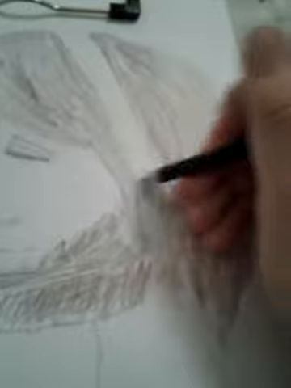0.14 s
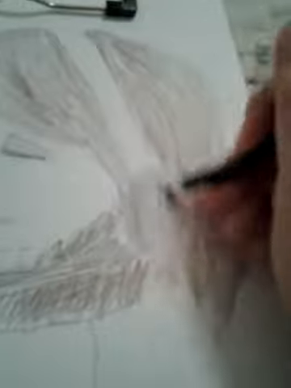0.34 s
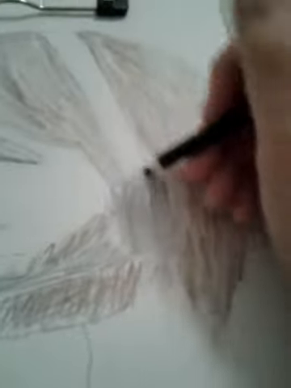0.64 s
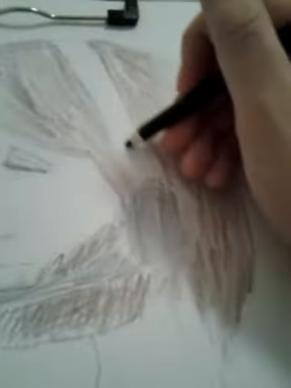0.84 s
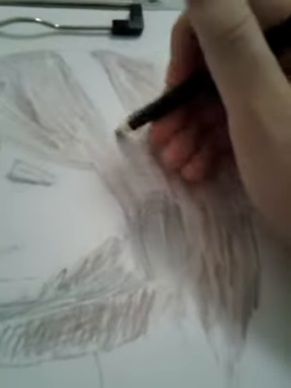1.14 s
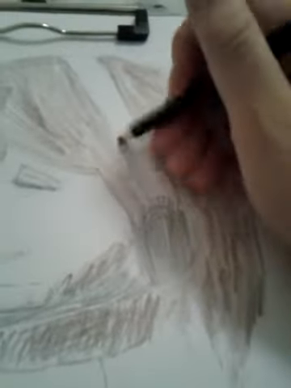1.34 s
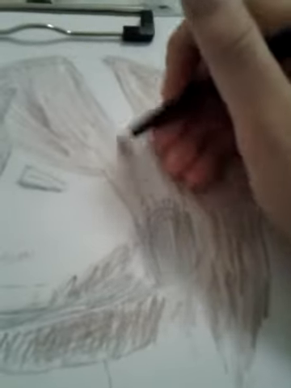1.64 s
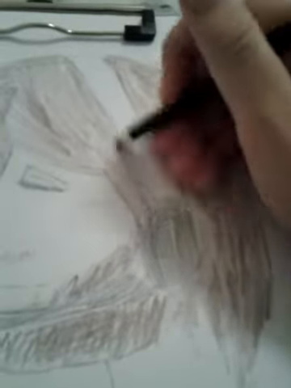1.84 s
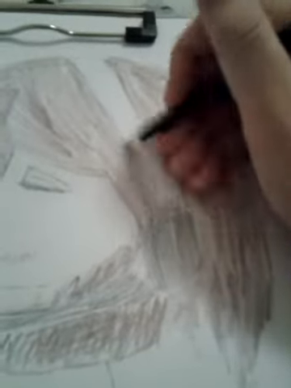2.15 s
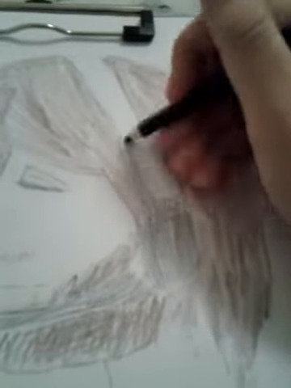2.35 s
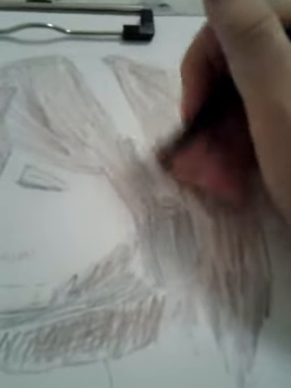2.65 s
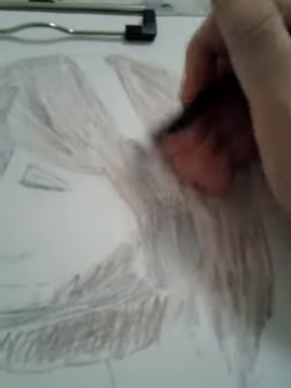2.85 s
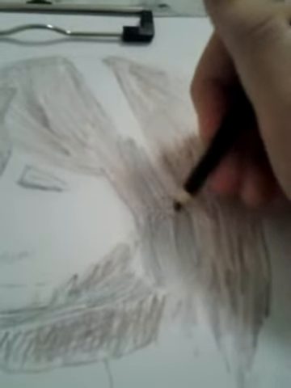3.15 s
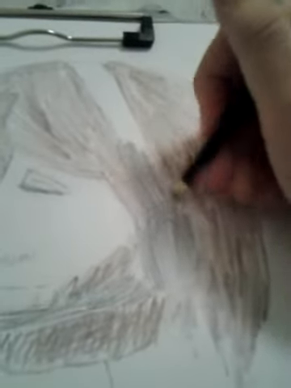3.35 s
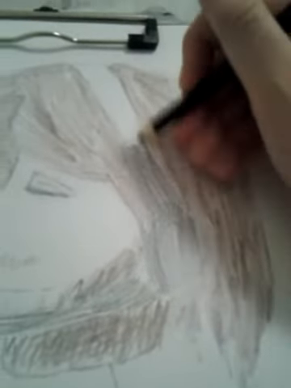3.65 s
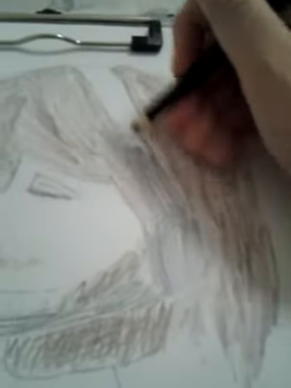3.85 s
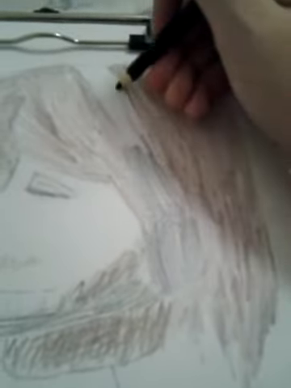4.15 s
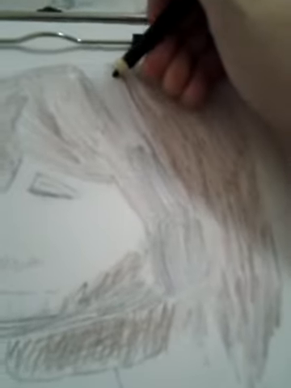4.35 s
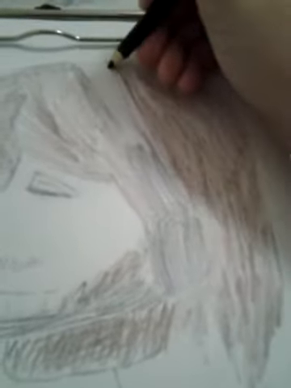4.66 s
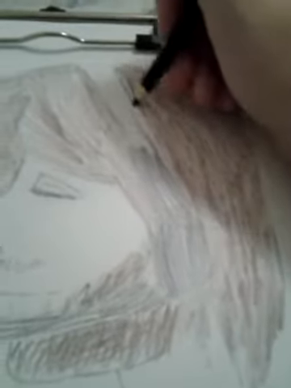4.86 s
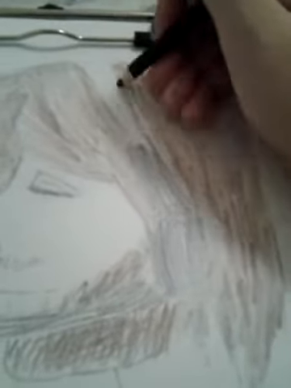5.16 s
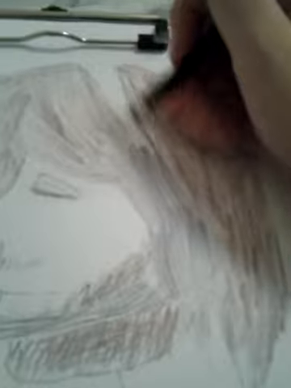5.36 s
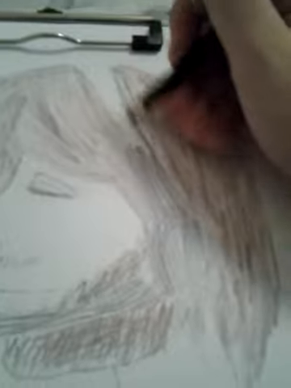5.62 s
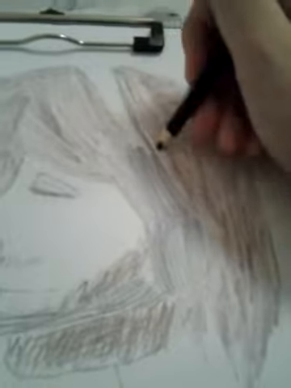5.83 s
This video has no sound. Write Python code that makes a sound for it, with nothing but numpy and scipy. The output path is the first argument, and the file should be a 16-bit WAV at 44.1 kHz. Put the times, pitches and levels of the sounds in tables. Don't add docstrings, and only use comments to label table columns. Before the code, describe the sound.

Close, dry mono sound of a pencil shading paper on a clipboard in a small quiet room. It opens mid-stroke: about five loose, uneven scratches until 0.55 s, with the tip digging in and a dull low knock of the board at 0.2 s, and the hand rubbing the sheet. At 0.6 s the tip lands with a dry tick; soft skin brushes follow at about 0.7 and 0.85 s. From 0.95 to 4.0 s comes a steady long run of alternating strokes, around eight or nine a second, bright grainy hiss over woody midrange, the board strongest near 1.7 s, with tiny fibre snaps. The hand slides away softly and only room noise remains until 4.76 s. A last run of ten slightly slower strokes, loudest near 5.3 s, lasts to the end around 6 s. Throughout: faint distant fan, microphone hiss, and a barely audible very high whistle.

```python
import sys
import numpy as np
from scipy import signal
from scipy.fft import rfft, irfft, next_fast_len
from scipy.io import wavfile
from scipy.ndimage import uniform_filter1d, map_coordinates

SR = 44100
rng = np.random.default_rng(int(sys.argv[2]) if len(sys.argv) > 2 else 0)


def to_wav(sig):
    pcm = np.clip(np.atleast_2d(sig), -1, 1) * 32767
    pcm = np.round(pcm).astype(np.int16)
    wavfile.write(sys.argv[1], SR, pcm.T)


def volts_from_db(level):
    exponent = np.asarray(level, float) / 20
    return 10 ** exponent


N = 264159

AREA_ENDS = [.8, 1.93, 4.4]


def unit(x):
    return x / np.sqrt(np.mean(x ** 2) + 1e-20)


def along(points, hz):
    f, v = np.transpose(points)
    return np.interp(np.log(hz + 1), np.log(f + 1), v)


def wobble(rate):
    return map_coordinates(rng.standard_normal(int(N * rate / SR) + 4), [np.arange(N) * rate / SR])


def filtered(x, response):
    m = next_fast_len(N + SR // 4)
    return irfft(rfft(x, m) * response(np.fft.rfftfreq(m, 1 / SR)), m)[:N]


def coloured(x, points):
    return unit(filtered(x, lambda f: volts_from_db(along(points, f))))


def fibres(per_second, spread_db, smooth):
    size_db = spread_db * np.clip(rng.standard_normal(N), -2, 2)
    trips = (rng.random(N) < per_second / SR) * volts_from_db(size_db) * rng.choice([-1, 1], N)
    return unit(unit(trips) + smooth * rng.standard_normal(N))


def patches(shape, depth_db):
    field = uniform_filter1d(rng.standard_normal(shape), size=4, axis=0)
    field = uniform_filter1d(field, size=12, axis=1)
    return volts_from_db(depth_db * unit(field))


def uneven(x, depth_db):
    z = signal.stft(x, nperseg=256)[2]
    return signal.istft(z * patches(z.shape, depth_db), nperseg=256)[1][:N]


def tilted(x, split_hz, tilt_db):
    low = filtered(x, lambda f: 1 / (1 + (f / split_hz) ** 8))
    area = np.searchsorted(AREA_ENDS, np.arange(N) / SR)
    tilt = volts_from_db(uniform_filter1d(np.take(np.array(tilt_db, float), area), size=8000))
    return low / tilt + (x - low) * tilt


def strokes():
    # start in seconds [s], fastest moment in seconds [s], tip level in dB [dB].
    loose_run = [
        (-0.077, -0.032, -43),
        (0.038, 0.12, -45.5),
        (0.18, 0.222, -42),
        (0.3, 0.405, -46),
        (0.423, 0.488, -46),
    ]
    landing = [
        (0.587, 0.604, -48),
    ]
    long_run = [(0.95, 1.012, -46), (1.065, 1.113, -45.5), (1.176, 1.255, -42.5), (1.305, 1.35, -43.5),
                (1.417, 1.49, -44.5), (1.547, 1.59, -46), (1.668, 1.744, -45), (1.805, 1.846, -45.5),
                (1.92, 2.015, -44.5), (2.066, 2.099, -43.5), (2.171, 2.251, -44), (2.305, 2.344, -43.5),
                (2.406, 2.486, -45), (2.537, 2.579, -44.5), (2.646, 2.71, -43.5), (2.766, 2.819, -45.0),
                (2.869, 2.931, -44), (2.994, 3.043, -45.5), (3.098, 3.152, -43.5), (3.215, 3.28, -45),
                (3.325, 3.373, -44.5), (3.434, 3.51, -44.5), (3.543, 3.6, -47), (3.659, 3.72, -46),
                (3.765, 3.819, -48.5), (3.86, 3.914, -47.1)]
    last_run = [
        (4.76, 4.798, -45),
        (4.887, 4.95, -48),
        (4.989, 5.053, -45),
        (5.126, 5.194, -47),
        (5.242, 5.289, -42.5),
        (5.374, 5.429, -45),
        (5.49, 5.555, -44.5),
        (5.614, 5.7, -47.5),
        (5.767, 5.82, -47.5),
        (5.889, 5.976, -46.6),
    ]
    run_ends = [.554, .666, 4.008, 6.02]
    # after a push [s], after a pull [s].
    turn_s = [(.033, .019), (0, 0), (.001, .009), (.008, .002)]
    # time in seconds [s], board over tip in dB [dB].
    hand_weight = [(0, -15.5), (1.1, -10.5), (1.35, -9), (1.7, -6), (1.95, -8.5), (3.05, -9), (3.52, -10),
                   (3.65, -14), (6, -11.5)]
    pull_change_db = [0, 0.71, 0.94, 0.49]
    shaft_over_tip_db = [-11.5, -12, -13, -13.5]
    shaft_follows = .75
    rows = []
    runs = [loose_run, landing, long_run, last_run]
    for run, end, turn, pull_db, shaft_db in zip(runs, run_ends, turn_s, pull_change_db, shaft_over_tip_db):
        for k, (start, fastest, tip_db) in enumerate(run):
            direction = (-1) ** k
            stop = run[k + 1][0] + turn[k % 2] if k + 1 < len(run) else end
            weight_db = np.interp(fastest, *np.transpose(hand_weight)) - direction * pull_db
            over_tip_db = np.array([0, weight_db, shaft_db + shaft_follows * (weight_db + 10)])
            rows.append((start, fastest, stop, direction, tip_db + over_tip_db))
    return rows


def motion(rise, fall, even, lean_db):
    t = np.arange(0, N / SR + .001, .001)
    gains, place, speed = np.zeros((3, len(t))), np.zeros(len(t)), np.zeros(len(t))
    for start, fastest, stop, direction, levels_db in strokes():
        middle = (start + stop) / 2
        halfway = [fastest + e * (middle - fastest) for e in even]
        done = np.array([np.interp(t, [start, half, stop], [0, .5, 1]) for half in halfway])
        power = np.where(done < .5, np.c_[rise], np.c_[fall])
        gains += volts_from_db(levels_db)[:, None] * np.abs(np.sin(np.pi * done)) ** power
        place[t >= start] = direction * np.cos(np.pi * done[2, t >= start])
        speed = np.maximum(speed, np.sin(np.pi * done[0]))
    gains *= volts_from_db(np.c_[lean_db] * place)
    return [np.interp(np.arange(N) / SR, t, curve) for curve in (*gains, place, speed)]


def hiss(grain, place, speed):
    # frequency in Hz [Hz], density in dB per Hz [dB].
    sheet_areas = [
        [(5000, -56), (6200, -38), (7200, -26), (7800, -12.5), (8600, -7.5), (9400, -10.5), (10400, -19),
         (11350, -14), (11800, -22), (12300, -20), (13100, -22), (13700, -17), (14600, -23), (15700, -27)],
        [(5000, -50), (6300, -33), (7200, -25), (7700, -25), (8400, -11.5), (8900, -11), (9800, -23),
         (10700, -18), (11350, -27), (12050, -14), (12750, -18), (13300, -25), (14400, -30), (15600, -22)],
        [(5000, -39.5), (6200, -43), (7400, -21.5), (7800, -24.5), (8450, -7.5), (8950, -17.5), (9300, -14.5),
         (10150, -25), (10650, -20.5), (11250, -25), (11900, -16), (13200, -26), (14900, -25.5), (15600, -38)],
        [(5000, -45), (6100, -35.5), (7200, -29), (8000, -18), (8750, -8.5), (9700, -13.5), (10350, -25.5),
         (11400, -18.5), (11800, -22), (12400, -12.5), (12800, -22), (13600, -32), (14200, -24), (15700, -32)],
    ]
    swing = [.02, .03, .05, .04]
    grip_slow, grip_fast = .95, 1.03
    hz, t, z = signal.stft(grain, SR, nperseg=256)
    area = np.searchsorted(AREA_ENDS, t)
    upper = np.clip((hz - 10400) / 1200, 0, 1) * np.clip((15200 - hz) / 1500, 0, 1)
    reach = upper[:, None] * np.interp(t * SR, np.arange(N), place)
    slid = hz[:, None] / (1 + np.take(swing, area) * reach)
    grip = np.interp(np.interp(t * SR, np.arange(N), speed), [0, 1], [grip_slow, grip_fast])
    slid /= 1 + (hz < 10400)[:, None] * (area == 0) * (grip - 1)
    colours = [volts_from_db(along(points, slid)) for points in sheet_areas]
    colour = np.choose(area, [c / np.sqrt(np.mean(c ** 2)) for c in colours])
    z = z * colour * volts_from_db(1.0 * reach) * patches(z.shape, depth_db=2.13)
    return unit(signal.istft(z, SR, nperseg=256)[1][:N])


def pencil():
    # frequency in Hz [Hz], density in dB per Hz [dB].
    shaft_colour = [(2000, -40), (2600, -12.5), (3120, 2), (3500, -2.5), (4000, -10.5), (4550, -1.5),
                    (5000, -11), (5400, -5.5), (6200, -13.5), (7500, -28), (12000, -120)]
    # frequency in Hz [Hz], width in Hz [Hz], level in dB [dB].
    board_modes = [(1175, 180, 3.5), (1467, 124, 4.5), (1640, 237, 0.5), (1896, 220, -1.5),
                   (2184, 220, -4.5)]
    board_tilt_db = [2.2, 1.3, 2.6, 3.2]
    shaft_tilt_db = [1.6, -1.5, 0.57, 0.65]
    dig_s, dig_length_s, dig_db = .2, .059, 4.4

    def board_response(f):
        ringing = 0
        for k, (centre, width, db) in enumerate(board_modes):
            mode = 1j * f * width / (centre * centre - f * f + 1j * f * width)
            ringing = ringing + (-1) ** k * volts_from_db(db) * mode
        return ringing / (1 + (1050 / (f + 1)) ** 12) / (1 + (f / 2450) ** 8)

    tip, board, shaft, place, speed = motion(
        rise=[1.4, 1.5, 1.4], fall=[1.7, 1.4, 1.5], even=[0, .9, .7], lean_db=[0, 1.5, 3.5])
    grain = fibres(per_second=3000, spread_db=3.0, smooth=1.2)
    coarse = uneven(fibres(per_second=2000, spread_db=4.5, smooth=1.3), depth_db=1.5)
    flutter = volts_from_db(0.55 * wobble(45) + 0.95 * wobble(300))
    sway = volts_from_db(.4 * wobble(25))
    wood = tilted(unit(filtered(coarse, board_response)), 1590, board_tilt_db)
    body = tilted(coloured(coarse + 0.73 * grain, shaft_colour), 5100, shaft_tilt_db)
    middle_s = dig_s + dig_length_s / 2
    dig = volts_from_db(dig_db * (np.abs(np.arange(N) / SR - middle_s) < dig_length_s / 2))
    scratch = flutter * tip * hiss(grain, place, speed)
    return scratch + sway * (volts_from_db(0.6) * board * wood + volts_from_db(-0.38) * shaft * body) * dig


def hand():
    # start in seconds [s], hold in seconds [s], hiss in dB [dB], fade in dB per second [dB/s].
    drags = [
        (-.1, .3, -52.5, 60),
        (0.292, 0.065, -49.5, 58),
        (.52, .13, -56.5, 60),
        (.69, .01, -52, 80),
        (0.812, 0.071, -53.5, 107),
        (1, 2.9, -64.5, 8),
        (3.962, 0.11, -57.5, 19),
        (4.85, 1.3, -64.5, 30),
    ]
    # frequency in Hz [Hz], density in dB per Hz [dB].
    skin_hiss = [(3530, -59), (6000, -41), (6740, -20), (7270, -11), (7720, -6.5), (8810, -0.5), (9200, 0),
                 (9930, -7.5), (10700, -6.5), (11700, -13), (12500, -7.5), (13800, -14), (15600, -23)]
    skin_body = [(650, -28), (1100, 1.5), (1180, -2), (1570, 3), (1690, -2.5), (1940, 2), (2490, -4.5),
                 (3070, -1), (3780, -4.5), (6500, -10.5), (8450, -49), (14300, -120)]
    rise_db_per_s = 83
    t = np.arange(N) / SR
    grain = fibres(per_second=4000, spread_db=2.5, smooth=1.13)
    levels_db = []
    for start, hold, db, fade in drags:
        rising = rise_db_per_s * np.maximum(start - t, 0)
        fading = fade * np.maximum(t - start - hold, 0)
        levels_db.append(db - rising - fading)
    hiss_db = np.max(levels_db, axis=0)
    body_db = -60.5 + 0.72 * (hiss_db + 55.5)
    fine = coloured(uneven(grain, depth_db=1.5), skin_hiss)
    body = coloured(grain, skin_body)
    flutter = volts_from_db(.8 * wobble(37))
    return flutter * (volts_from_db(hiss_db) * fine + volts_from_db(body_db) * body)


def room():
    # frequency in Hz [Hz], density in dB per Hz [dB].
    air_colour = [(15, -21), (40, -34.5), (120, -19.5), (200, -15), (262, -11.5), (400, -10.5), (560, -5.5),
                  (760, -10.5), (1050, -13), (1300, -17), (1900, -9.5), (2500, -15.5), (4000, -30.5),
                  (6500, -47)]
    # frequency in Hz [Hz], width in Hz [Hz], lift in dB [dB].
    fan_modes = [(269, 11, 7.0), (314, 30, 7.6), (359, 11, 3.3), (419, 14, 4.8), (448, 14, 2.6),
                 (478, 24, 4.5), (510, 13, 5.8), (541, 16, 5.8), (577, 18, 8.5), (612, 22, 7.5),
                 (690, 22, 7.0), (720, 13, 4.4), (779, 6, 2.4), (807, 44, 8.7), (869, 17, 5.8),
                 (899, 12, 9.1), (929, 11, 7.2), (989, 19, 2.5), (1019, 15, 7.2), (2192, 27, 4.5),
                 (2370, 25, 3.5)]

    def response(f):
        lift_db = sum(db / (1 + (2 * (f - centre) / width) ** 2) for centre, width, db in fan_modes)
        return volts_from_db(along(air_colour, f) + lift_db)

    air = unit(filtered(rng.standard_normal(N), response))
    return volts_from_db(-56.5 + 0.075 * wobble(1.99)) * air


def whistle():
    # frequency in Hz [Hz], rms level in dB [dB].
    line_tones = [(15715, -82), (15736, -84)]
    t = np.arange(N) / SR
    out = np.zeros(N)
    for hz, db in line_tones:
        level = volts_from_db(db + 3 + 2.5 * wobble(6))
        out += level * np.sin(2 * np.pi * hz * t + 2.5 * wobble(8))
    return out


def snags():
    # time in seconds [s], peak level in dB [dB].
    coarse_fibres = [(0.2028, -30), (2.0137, -21.5), (2.2397, -24), (2.3371, -29), (2.4639, -40),
                     (2.4737, -35), (2.5644, -28), (3.913, -30), (4.798, -26), (5.0398, -26.5),
                     (5.2887, -26)]
    out, t = np.zeros(N + SR), np.arange(SR // 100) / SR
    swell = (t / .001) ** 2 * np.exp(2 - 2 * t / .001)
    for s, db in coarse_fibres:
        ring = sum(np.sin(2 * np.pi * (rng.normal(8660, 220) * t + rng.random())) for _ in range(3))
        out[round(s * SR):][:len(t)] += volts_from_db(db - 13.0) * swell * ring
    return out[:N]


def thump():
    start_s, level_db, t60_s = .203, -48.5, 0.17
    t = np.maximum(np.arange(N) / SR - start_s, 0)
    envelope = volts_from_db(level_db - 60 * t / t60_s) * (1 - np.exp(-t / 0.0025))
    return envelope * (np.sin(2 * np.pi * 425 * t) + np.sin(2 * np.pi * 462 * t))


def tick():
    start_s, level_db, t60_s = .6005, -41, .03
    t = np.arange(N) / SR - start_s
    envelope = (t > 0) * volts_from_db(level_db - 60 * np.maximum(t, 0) / t60_s)
    burst = envelope * rng.standard_normal(N)
    return filtered(burst, lambda f: 1 / (1 + (6500 / (f + 1)) ** 4))


def walls(x):
    t60_s, level_db = .05, -15
    t = np.arange(SR // 4) / SR
    tail = rng.standard_normal(len(t)) * volts_from_db(-60 * t / t60_s)
    return volts_from_db(level_db) * signal.fftconvolve(x, tail / np.linalg.norm(tail))[:N]


def scene():
    near = pencil() + hand() + snags() + thump() + tick()
    return np.tile(near + walls(near) + room() + whistle(), (2, 1))


def band_limit(x):
    return signal.sosfilt(signal.butter(12, 16560, fs=SR, output="sos"), x)


def record(dry):
    # frequency in Hz [Hz], density in dB per Hz [dB].
    mic_hiss = [(1800, -49), (3000, -1), (4000, -9), (5000, -11), (6000, -15.5), (7000, -9), (10000, -8),
                (13700, -6.5), (15600, -0.5)]
    top_hz, offset = 15745, -.0002
    self_noise = volts_from_db(-61.5) * coloured(rng.standard_normal(N), mic_hiss)
    mono = filtered(dry[0] + self_noise, lambda f: volts_from_db(-.3 * np.maximum(f - top_hz, 0))) + offset
    return band_limit(np.array([mono, mono]))


dry = scene()
out = record(dry)
to_wav(out)
```